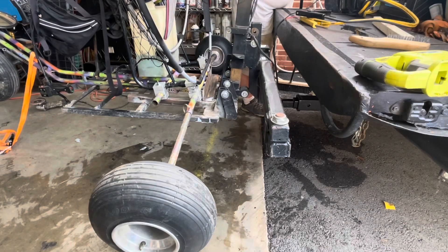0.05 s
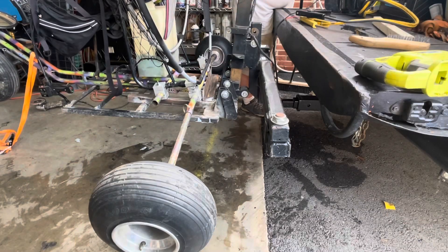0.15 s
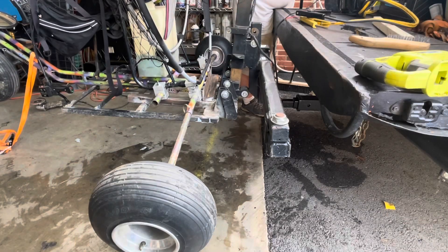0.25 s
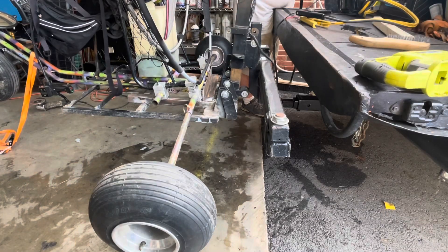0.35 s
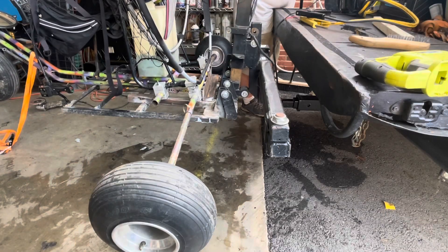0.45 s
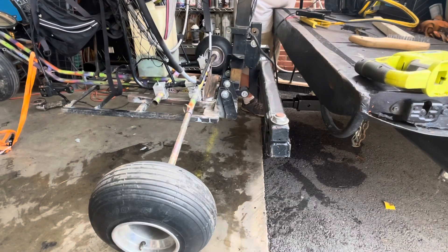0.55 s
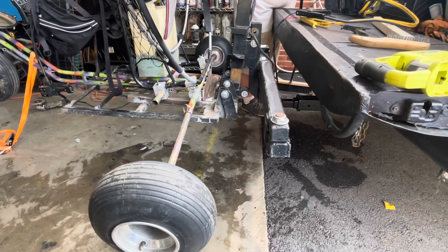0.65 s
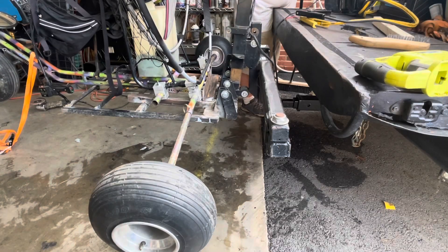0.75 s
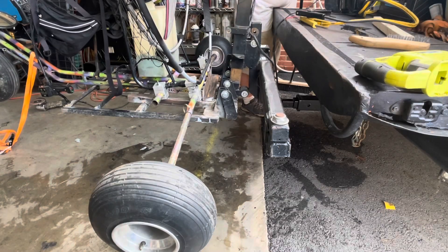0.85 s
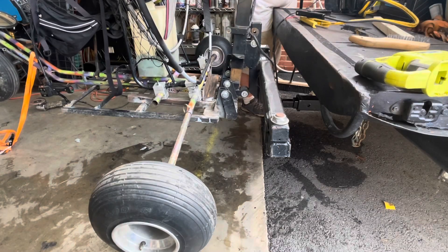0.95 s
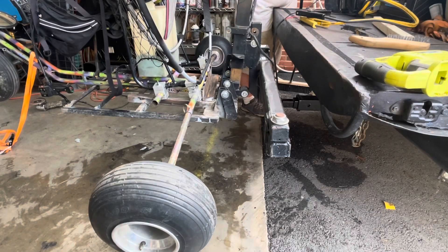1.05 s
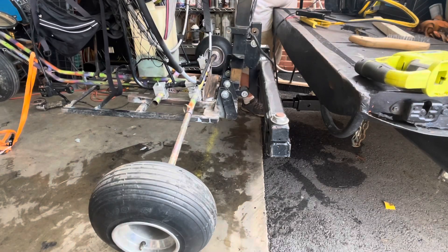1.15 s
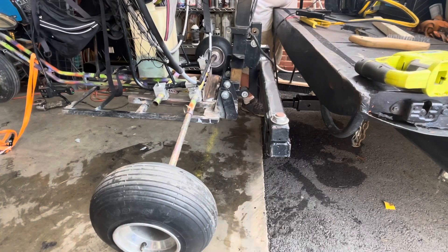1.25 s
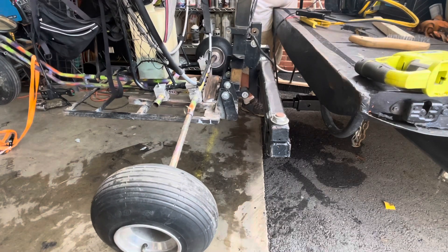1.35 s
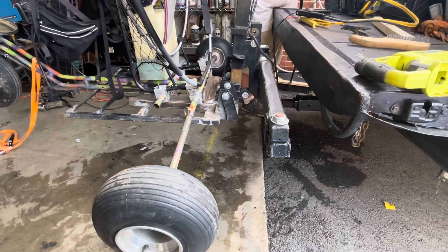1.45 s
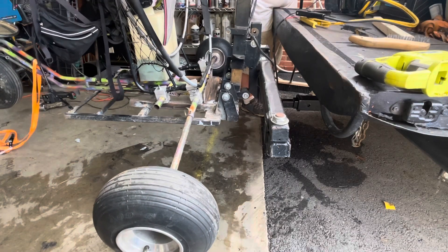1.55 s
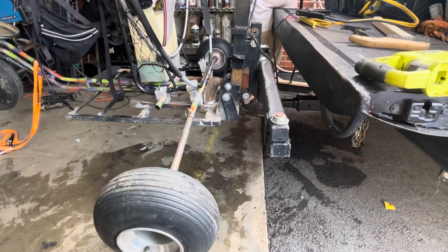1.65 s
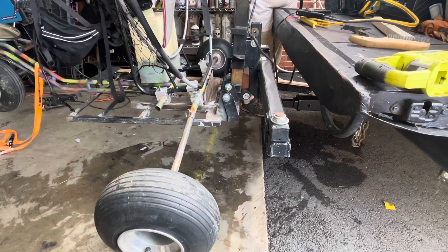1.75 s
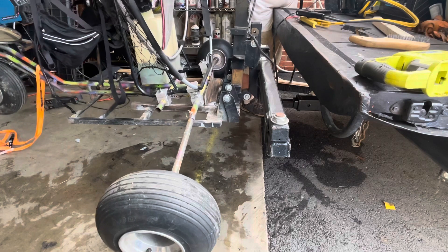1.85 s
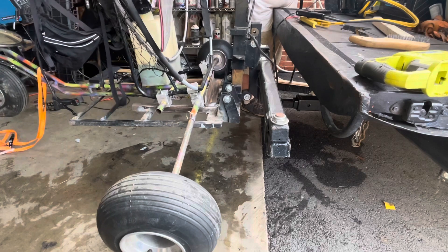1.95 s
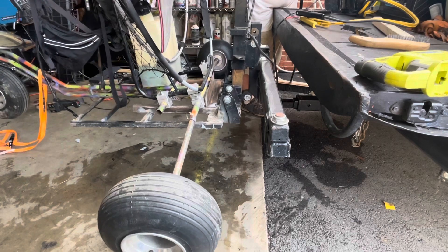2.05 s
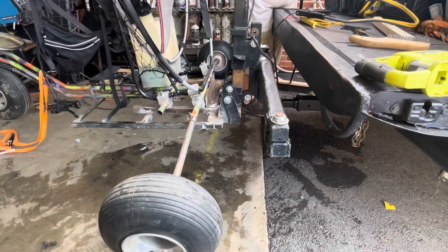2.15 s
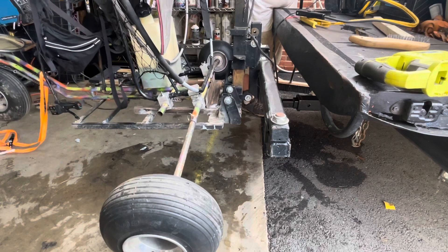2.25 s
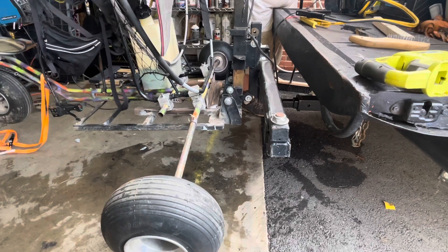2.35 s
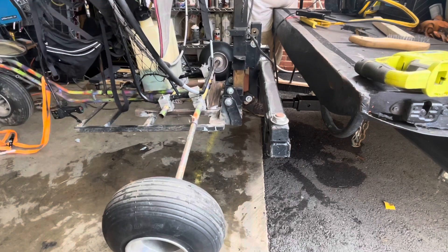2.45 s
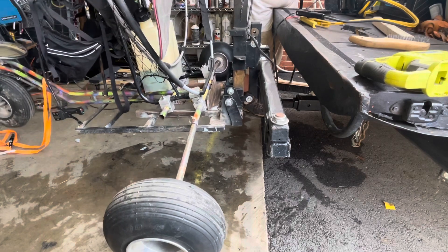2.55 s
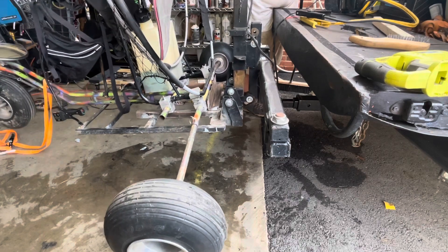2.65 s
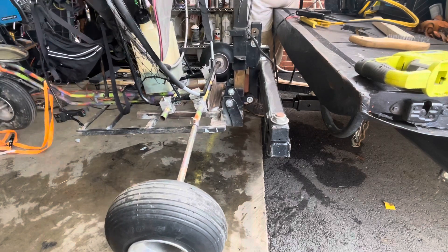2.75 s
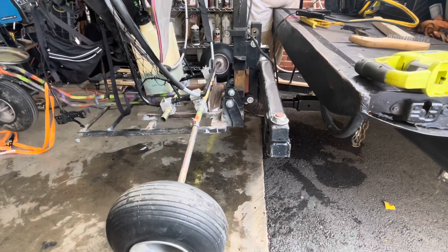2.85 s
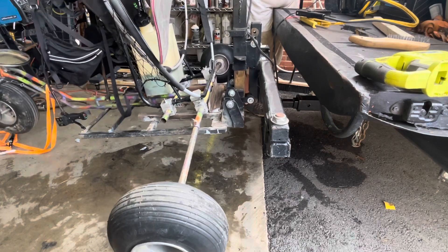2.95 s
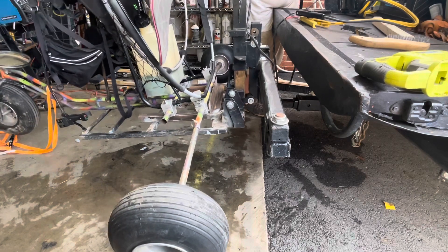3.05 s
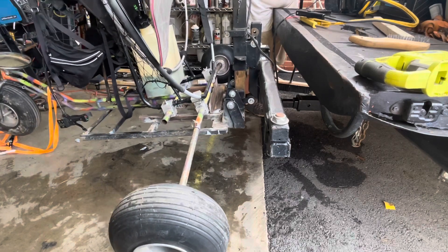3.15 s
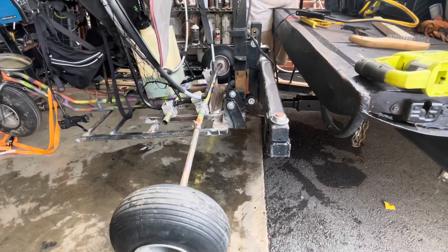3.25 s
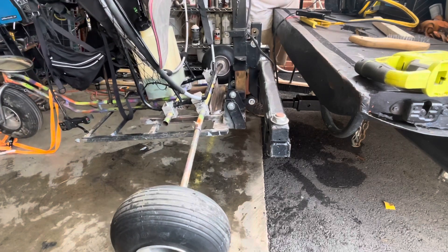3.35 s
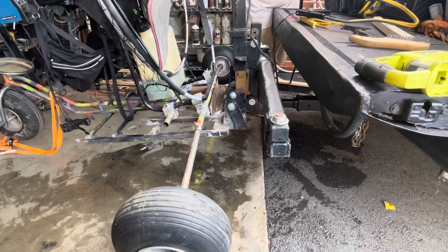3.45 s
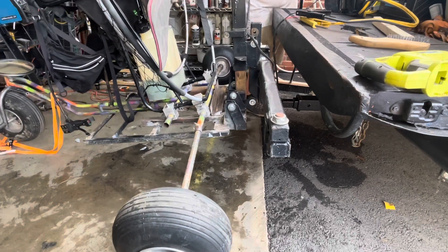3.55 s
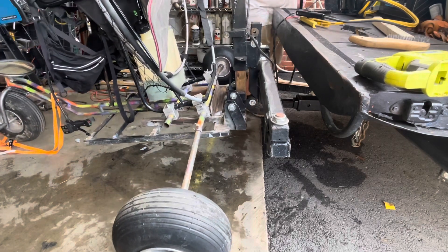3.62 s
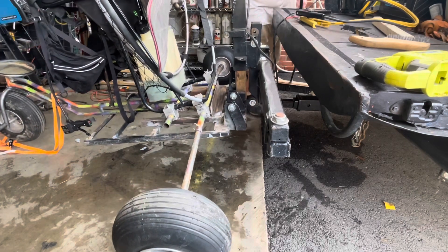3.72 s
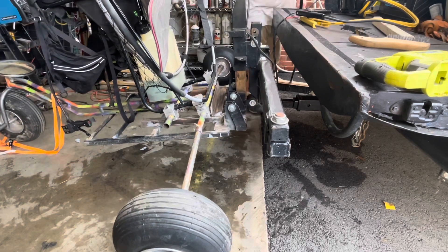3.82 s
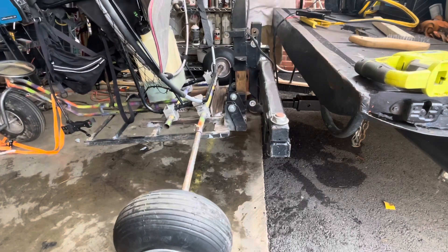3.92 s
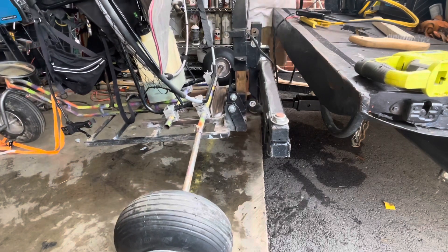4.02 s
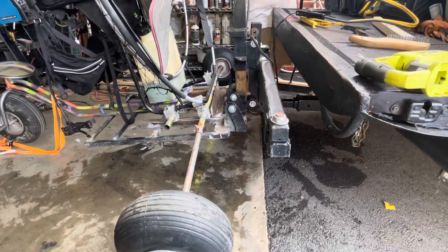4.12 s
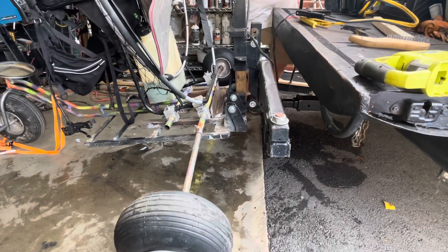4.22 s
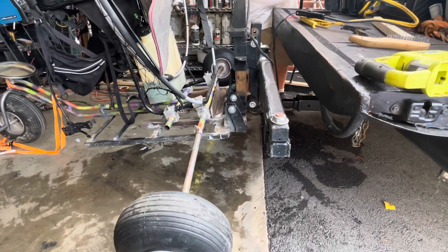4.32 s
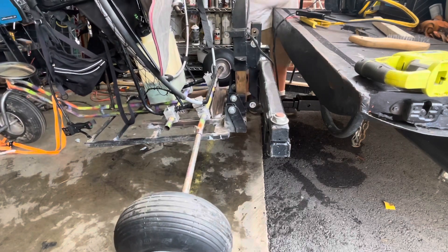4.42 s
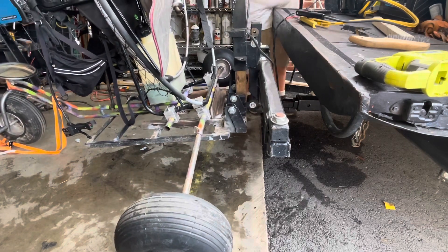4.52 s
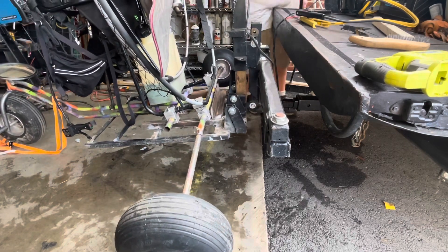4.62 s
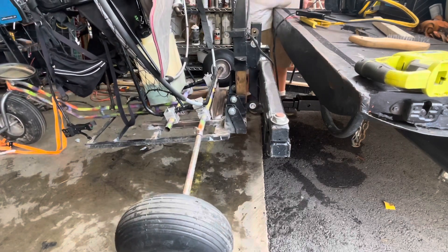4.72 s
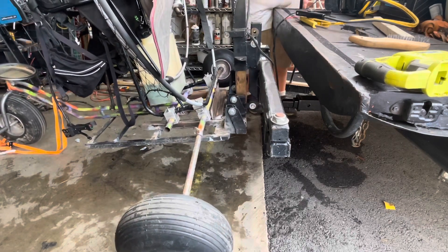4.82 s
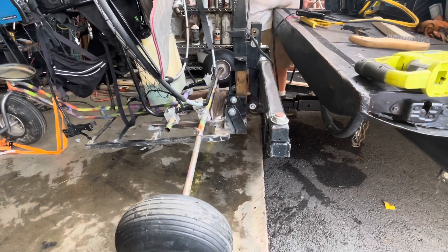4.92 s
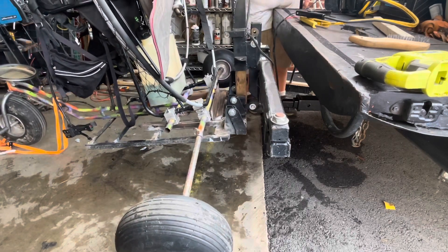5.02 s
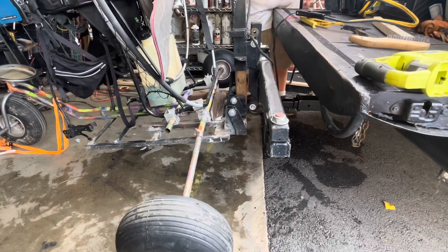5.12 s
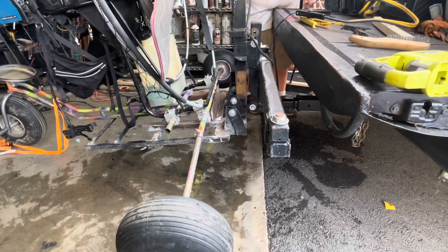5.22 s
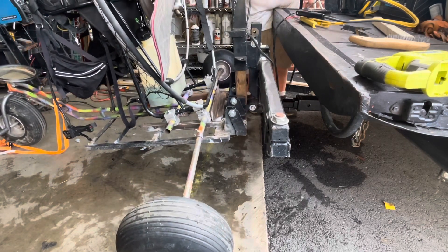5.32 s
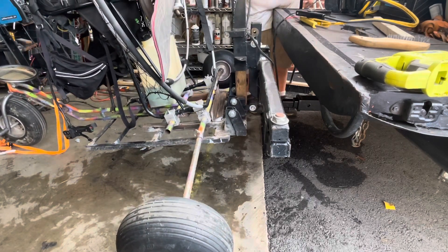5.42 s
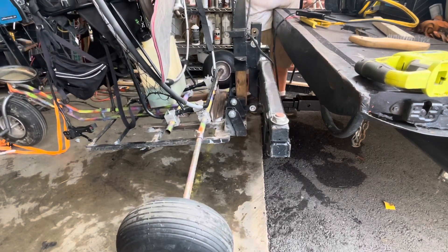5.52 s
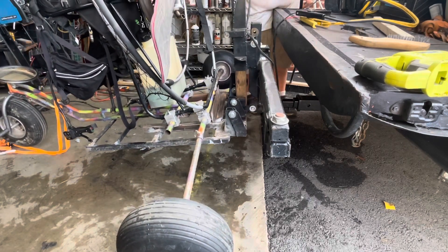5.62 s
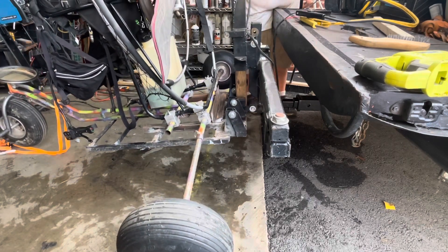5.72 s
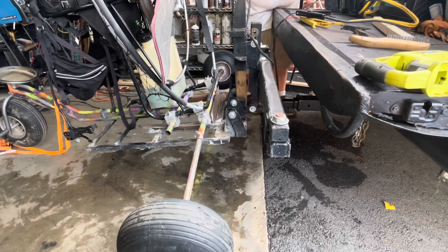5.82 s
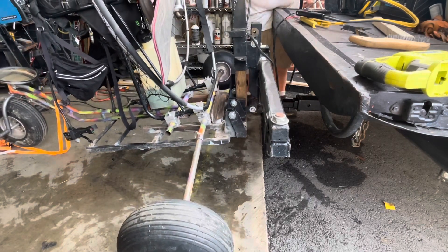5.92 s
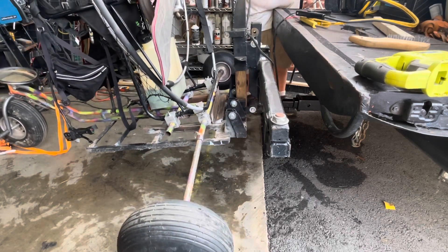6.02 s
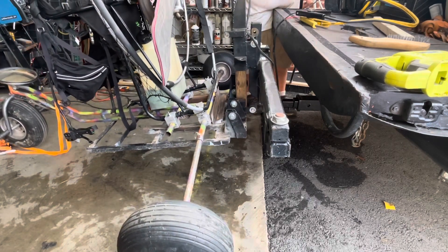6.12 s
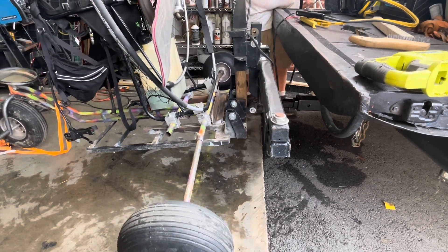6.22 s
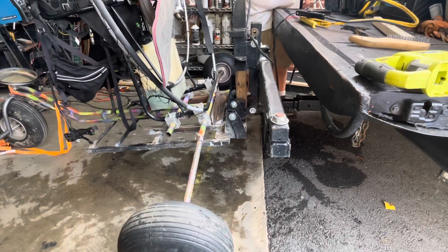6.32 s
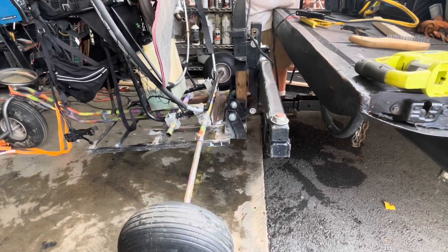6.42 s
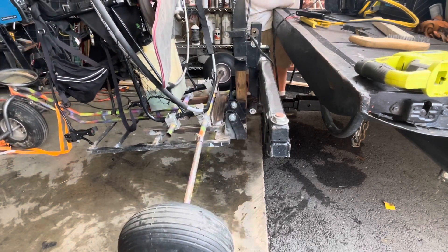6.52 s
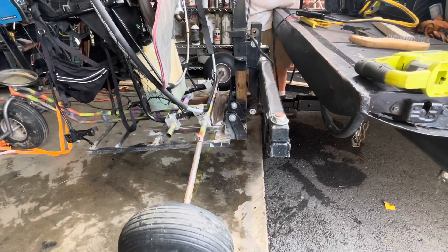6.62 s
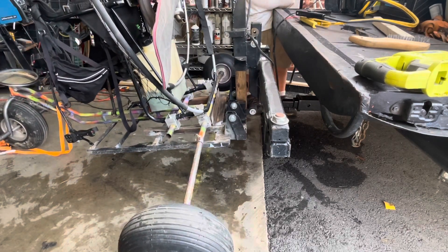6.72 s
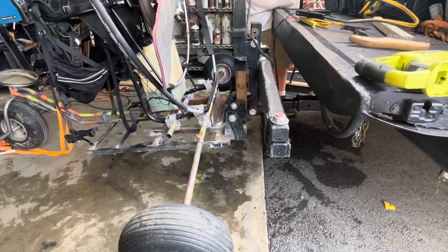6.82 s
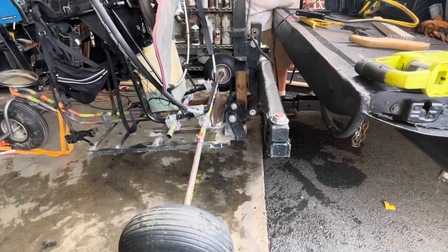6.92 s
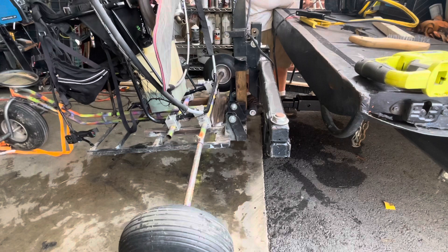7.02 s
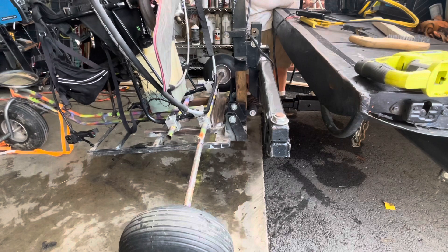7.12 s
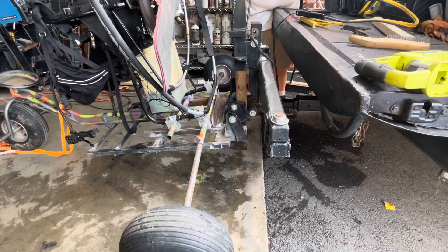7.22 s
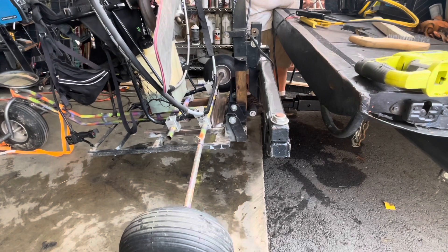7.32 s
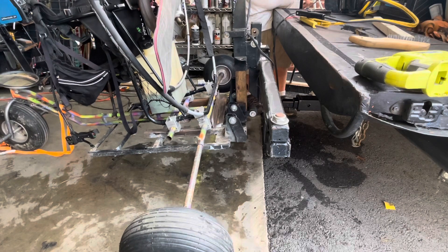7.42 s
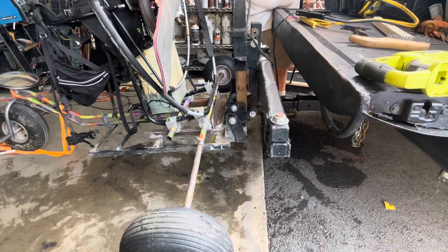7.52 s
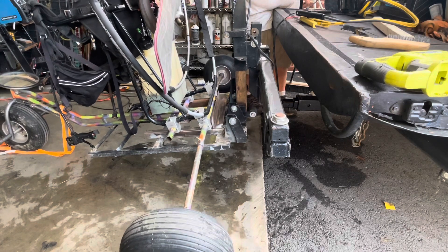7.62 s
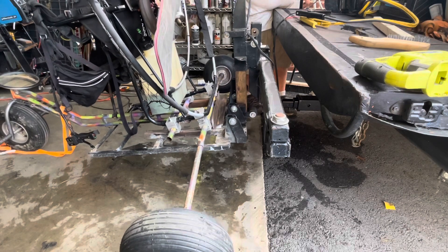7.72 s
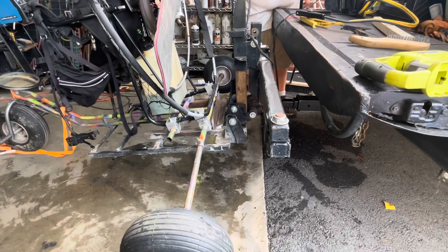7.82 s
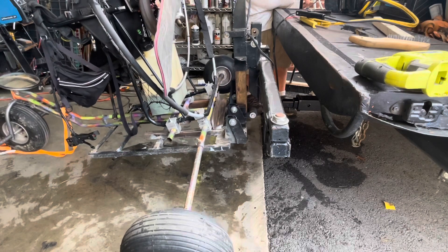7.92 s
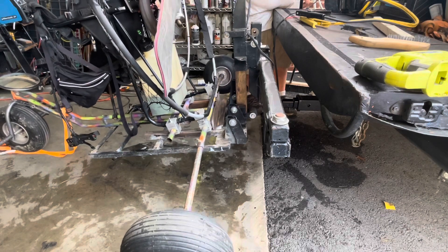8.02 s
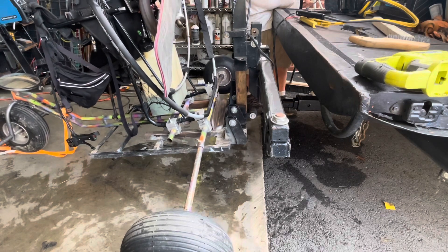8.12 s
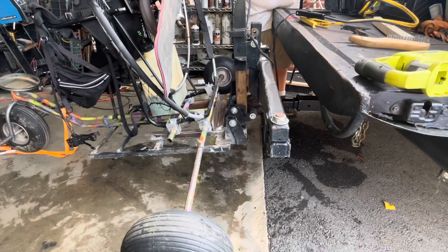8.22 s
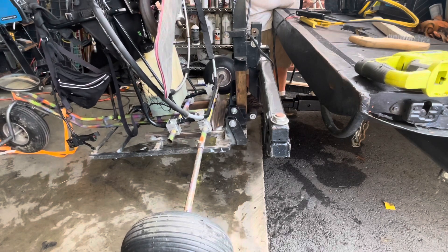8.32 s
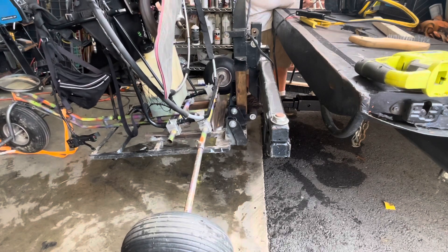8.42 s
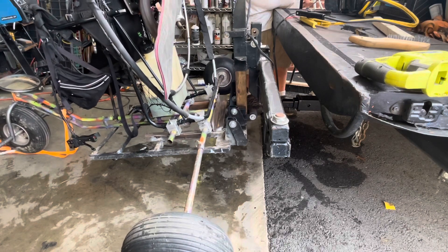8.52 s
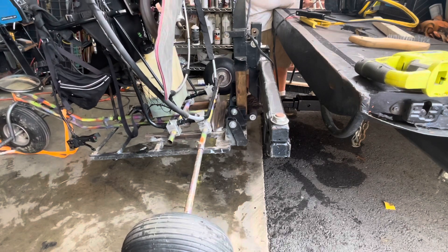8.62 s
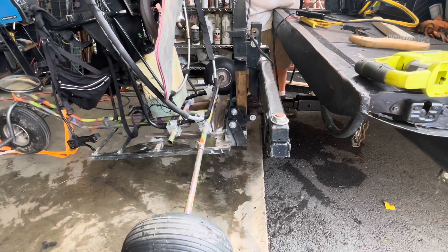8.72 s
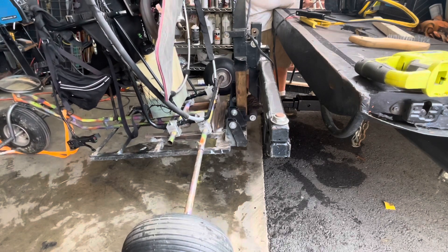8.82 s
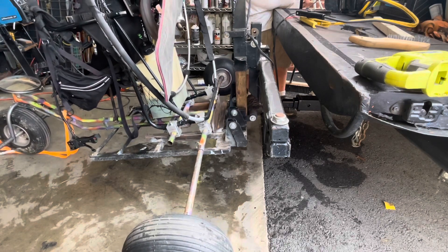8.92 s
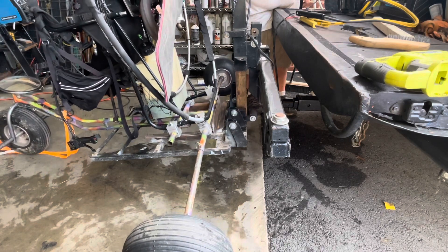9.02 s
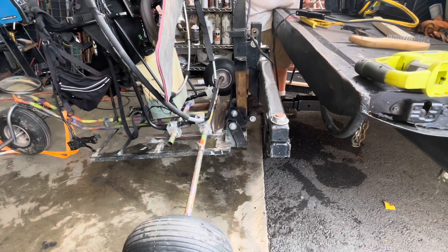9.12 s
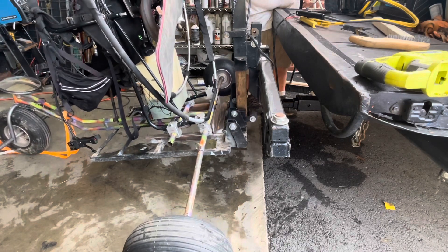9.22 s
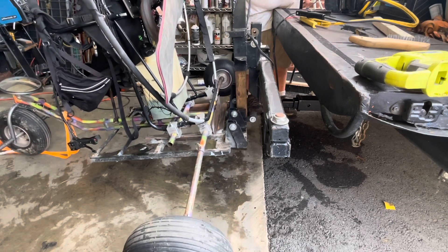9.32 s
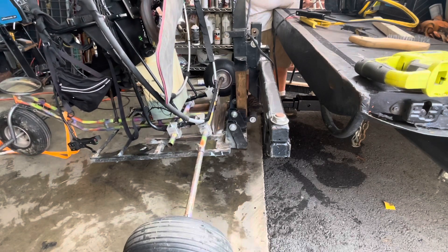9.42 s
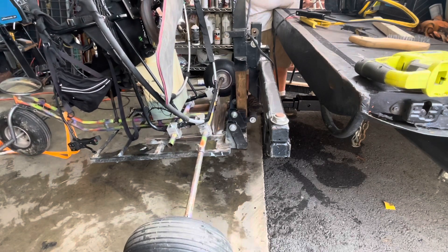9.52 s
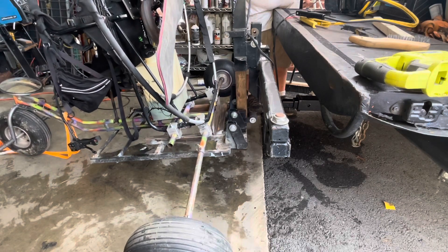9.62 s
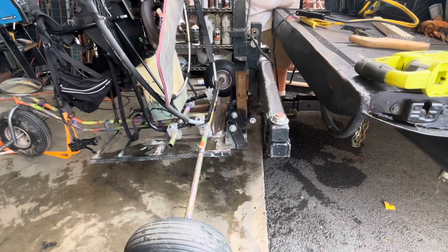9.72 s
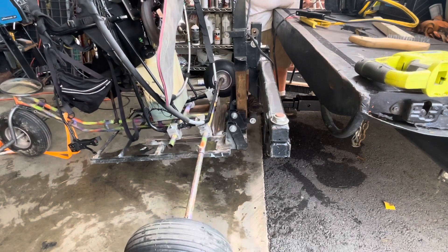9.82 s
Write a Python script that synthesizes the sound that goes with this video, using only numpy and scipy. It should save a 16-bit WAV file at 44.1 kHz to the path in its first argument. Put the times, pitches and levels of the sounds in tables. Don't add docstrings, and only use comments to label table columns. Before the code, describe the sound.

A garage opens onto low street rumble, faint mains-like hums and a thin high insect tone. From 0 to 0.8 seconds something rustles softly, strongest near 0.3, and a small switch clicks with a tiny bounce at 0.17. At 1.09 a relay clacks in several rapid metallic knocks, with a late one at 1.14. The lift motor spins up within about a tenth of a second, sweeping through ringing frame resonances while gears clatter. It then whines steadily around 1.1 and 2.3 kilohertz, throbbing three or four times per second, over gear rattle and bright brush hiss. Between 3.55 and 3.9 the frame scrapes grittily and jerks; the whine's colour shifts slightly. Pitch creeps up very gently. From 7 seconds a far vehicle drones low, swelling around 8.4 and 9. The motor is still running at the end, near 9.8. Close stereo microphone, short room reverberation.

```python
import sys
import numpy as np
from scipy import signal
from scipy.fft import rfft, irfft
from scipy.io import wavfile
from scipy.ndimage import uniform_filter1d

SR = 44100
rng = np.random.default_rng(int(sys.argv[2]) if len(sys.argv) > 2 else 0)


def ratio(d):
    e = np.asarray(d, float) / 20
    return 10 ** e


def wav_record(signal):
    frames = np.transpose(np.atleast_2d(signal))
    bounded = np.clip(frames, -1, 1)
    quanta = np.round(bounded * 32767).astype(np.int16)
    wavfile.write(sys.argv[1], SR, quanta)


N = 434826
T = np.arange(N) / SR
START_S = 1.091


def evened(x):
    return x / np.sqrt(np.mean(x ** 2) + 1e-20)


def read(points, hz):
    f, value = np.transpose(points)
    return np.interp(np.log(hz + 1), np.log(f + 1), value)


def curves(rows):
    s, *columns = np.transpose(rows)
    return [np.interp(T, s, c) for c in columns]


def slow(per_s, channels):
    knots = np.arange(0, T[-1] + 1, .25 / per_s)
    rows = uniform_filter1d(rng.standard_normal((channels, len(knots))), size=4)
    return evened(np.array([np.interp(T, knots, row) for row in rows]))


def padded(x, first=0):
    return np.pad(x, ((0, 0), (first, N - first - x.shape[1])))


def resonate(x, hz, width):
    turn = np.exp(2j * np.pi * np.cumsum(hz * np.ones(N)) / SR)
    r = np.exp(-np.pi * width / SR)
    return 2 * (turn * signal.lfilter([1 - r], [1, -r], x / turn)).real


def garage(x, t60=.35, wet_db=-3):
    t = np.arange(SR // 2) / SR
    tail = rng.standard_normal((2, len(t))) * ratio(-60 * t / t60) * (t > .004)
    tail = ratio(wet_db) * tail / np.linalg.norm(tail[0])
    tail[:, 0] = 1
    return signal.fftconvolve(x[None], tail, axes=1)[:, :len(x)] / np.linalg.norm(tail[0])


# frequency in Hz, left lead in rad.
PORT_LEAD = [(0, 0), (170, -.7), (600, 2.7), (1000, 1.3), (1700, .5), (2500, 1.2), (3200, 3), (5700, 3.5),
             (7000, 6.1), (7600, 5.7), (9200, 9.2), (10000, 8.6), (10900, 8.9), (12700, 6.28),
             (22050, 6.28)]
# frequency in Hz, left over right in dB.
PORT_DB = [(60, -4.5), (110, -6.5), (200, -7.5), (380, -6.0), (700, 0.0), (1290, 0.0), (2380, -2.5),
           (4400, 2.5), (8120, -0.5), (15000, 0.5)]
# frequency in Hz, likeness from 0 to 1.
PORT_SAME = [(50, .97), (150, .9), (350, .65), (800, .7), (1500, .7), (3000, .7), (4500, .45), (7000, .7),
             (8500, .5), (9800, .9), (11300, .65), (12700, .97)]


def ports(x, colour_db, patchy_db=0.):
    hz, _, z = signal.stft(x, SR, nperseg=1024, noverlap=640)
    turn, patches = rng.random((z.shape[1], 513, 2)).T
    patches = evened(uniform_filter1d(uniform_filter1d(patches - .5, 8, 0), 16, 1))
    same = np.clip(read(PORT_SAME, hz), 0, 1)[:, None]
    other = 1.5 * np.roll(z, 7, 0) * np.exp(2j * np.pi * uniform_filter1d(9 * turn, 3, 1))
    lag = np.exp(-1j * np.interp(hz, *np.transpose(PORT_LEAD)))[:, None]
    right = (same * z + np.sqrt(1 - same ** 2) * other) * lag
    half_db = read(PORT_DB, hz)[:, None] / 2
    colour = ratio(colour_db(hz)[:, None] + patchy_db * patches)
    pair = np.array([z * ratio(half_db), right * ratio(-half_db)]) * colour
    out = signal.istft(pair, SR, nperseg=1024, noverlap=640)[1][:, :len(x)]
    return out / np.sqrt(np.mean(out.mean(0) ** 2))


# frequency in Hz, density in dB per Hz.
STREET = [(20, -48), (38, -12.5), (55, 0), (80, -9.5), (115, -4.5), (170, -6.5), (340, -13), (450, -15),
          (900, -14.5), (1500, -39), (3000, -44), (5600, -42), (6900, -34), (9000, -49), (15000, -52)]
# frequency in Hz, width in Hz, level in dB.
HUMS = [(56, 15, -56), (119, 10, -61), (192, 7, -66), (239, 6, -67), (345, 12, -68), (6870, 110, -74)]
# time in seconds, frequency in Hz, level in dB.
FAR = [
    (6.3, 90, -80),
    (7.1, 96, -63),
    (7.9, 103, -62),
    (8.44, 106, -57),
    (8.7, 105, -60),
    (8.95, 112, -58),
    (9.3, 114, -64),
    (9.8, 122, -61),
]


def outdoors():
    rumble = ratio(-58) * ports(rng.standard_normal(N), lambda hz: read(STREET, hz), patchy_db=2.0)
    bins = np.fft.rfftfreq(N, 1 / SR)
    shape = sum(ratio(db) / np.sqrt(width) / (1 + (2 * (bins - hz) / width) ** 2) for hz, width, db in HUMS)
    hums = irfft(rfft(rng.standard_normal(N)) * shape * np.sqrt(SR / np.pi * 2), N)
    far_hz, far_db = curves(FAR)
    far = resonate(resonate(rng.standard_normal(N), far_hz, 9.4), far_hz, 30.0)
    return rumble + (hums + ratio(far_db) * evened(far)) * ratio([[-3.8], [2.6]])


def friction(rows, colour, per_s, uneven_db):
    first, last = round(rows[0][0] * SR), round(rows[-1][0] * SR)
    count = last - first
    size = ratio(uneven_db * rng.exponential(1, count)) * (rng.random(count) < per_s / SR)
    slips = ports(size * rng.standard_normal(count), lambda hz: read(colour, hz))
    return ratio(curves(rows)[0]) * padded(slips, first)


# time in seconds, level in dB.
RUSTLE = [
    (0, -83),
    (.08, -79),
    (.19, -80),
    (.3, -67),
    (.37, -77),
    (.52, -76),
    (.65, -75.5),
    (.75, -83),
    (.85, -99),
]
# frequency in Hz, density in dB.
RUSTLE_COLOUR = [(500, -12), (1500, 2.5), (3000, -2), (5000, -4), (8000, -22), (10000, -16), (13000, -13),
                 (15500, -24)]


def rustle():
    return friction(RUSTLE, RUSTLE_COLOUR, per_s=17000, uneven_db=2.5)


def knock(modes, blows, crack_db):
    t, train = np.arange(12000) / SR, np.zeros(2 * SR)
    for s, db in blows:
        train[round(s * SR)] = ratio(db)
    ring = sum(ratio(db - 60 * t / t60) * np.sin(2 * np.pi * hz * t) for hz, db, t60 in modes)
    noise = signal.lfilter([1, -1], [1, -.8], rng.standard_normal(len(t)))
    ring = ring + ratio(crack_db - 60 * t / .025) * noise
    return signal.oaconvolve(train, ring * np.clip(t / 0.00078, 0, 1))[:2 * SR]


# frequency in Hz, level in dB, t60 in seconds.
SWITCH = [(1800, -3, .035), (1812, -19, .2), (3750, -20, .015), (4440, -19, .02), (5050, -21, .012)]


def switch_click():
    return knock(SWITCH, [(.1715, -32.5), (.1782, -40)], -22)


# frequency in Hz, level in dB, t60 in seconds.
FRAME = [(573, -10, 0.14), (860, -4, 0.29), (1120, 6.5, 0.065), (1420, 0, 0.085), (1890, -4, 0.04),
         (4000, 5, 0.0082), (4500, -9, 0.044), (7600, -5, 0.033), (8550, -17, .04), (10900, -14, .03)]
# time in seconds, level in dB.
BLOWS = [
    (1.0915, -43),
    (1.094, -37),
    (1.1025, -34),
    (1.1075, -40),
    (1.138, -39),
]


def relay_clack():
    return knock(FRAME, BLOWS, 0.5)


# peak time in seconds, frequency in Hz, level in dB, t60 in seconds.
SHAKES = [
    (1.095, 1930, -28, .05),
    (1.104, 1700, -34, .06),
    (1.11, 1480, -33, .1),
    (1.108, 1170, -35, .08),
    (1.105, 830, -40, .1),
    (1.138, 1740, -31, .05),
    (1.146, 900, -31, .07),
    (1.16, 1420, -36, .1),
    (1.19, 1080, -40, .12),
]


def shakes():
    t = T[:2 * SR]
    out = np.zeros(2 * SR)
    for s, hz, db, t60 in SHAKES:
        envelope_db = np.where(t < s, (t - s) / 0.017 * 20, -60 * (t - s) / t60)
        out += ratio(db + envelope_db) * (t > START_S) * np.sin(2 * np.pi * (hz * t + rng.random()))
    return out


# time in seconds, level in dB.
SCRAPE = [
    (3.55, -63),
    (3.582, -72),
    (3.6, -52),
    (3.678, -48),
    (3.784, -50.5),
    (3.81, -43.5),
    (3.89, -117),
    (3.9, -78),
]
# frequency in Hz, density in dB.
SCRAPE_COLOUR = [(100, -1), (300, -7.5), (600, -1.5), (900, 1), (1600, -6.5), (3000, -4), (6000, -15),
                 (12000, -60)]


def scrape():
    return ratio(4.0) * friction(SCRAPE, SCRAPE_COLOUR, per_s=1700, uneven_db=1.5)


def beat(parts, wheel):
    pairs = zip(parts[::2], parts[1::2])
    return sum(c * np.cos(k * wheel) + s * np.sin(k * wheel) for k, (c, s) in enumerate(pairs, 1))


# time in seconds, shaft speed in turns per s.
SPEED = [(1.31, 70.9), (1.5, 70.68), (1.7, 70.35), (2.0, 70.26), (2.3, 70.68), (3.0, 70.78), (3.5, 70.96),
         (3.62, 70.51), (3.75, 71.03), (4.3, 70.87), (5.0, 70.94), (5.7, 71.07), (6.4, 71.3), (7.1, 71.24),
         (7.8, 71.5), (8.5, 71.67), (9.2, 71.78), (9.86, 71.84)]
# cos and sin parts once, twice, thrice a wheel turn, in turns per s.
WOBBLE = [-.11, .09, -.08, -.08, .03, .04]


def shaft():
    gear, spin_gap, spin_s, spin_shape = 20, 26, .068, 1.6
    on = T > START_S
    shortfall = spin_gap * np.exp(-(np.maximum(T - START_S, 0) / spin_s) ** spin_shape)
    speed = (curves(SPEED)[0] - shortfall) * on
    wheel = 2 * np.pi * np.cumsum(speed) / SR / gear
    angle = 2 * np.pi * np.cumsum(speed + beat(WOBBLE, wheel) * on) / SR
    return angle, wheel, speed


def per_turn(angle, heights, loose):
    tables = irfft(heights * np.exp(2j * np.pi * rng.random((3, len(heights)))), 16384) * 8192
    at = (angle / (2 * np.pi) % 1 * 16384).astype(int)
    a, b = slow(11, channels=2)
    return (tables[0, at] + loose * (a * tables[1, at] + b * tables[2, at])) / np.sqrt(1 + 2 * loose ** 2)


# frequency in Hz, density in dB per Hz.
HISS = [(2300, -25), (2800, -13), (3150, -19.5), (3600, -14), (4900, -17.5), (5500, -12.5), (6700, -11.5),
        (7300, -16.5), (8600, -9.5), (9400, -5.5), (10300, -5.5), (11200, -7), (13000, -16), (13700, -22.5),
        (14000, -27), (15200, -19), (15600, -48)]
# frequency in Hz, width in Hz, level in dB over the hiss.
HOUSING = [(3450, 200, 5), (4540, 150, 5), (5680, 120, 5), (6100, 200, 5), (6850, 200, 7), (7970, 200, 5),
           (7350, 200, -4), (8480, 350, -5), (8950, 500, 9), (9550, 250, -6), (10000, 600, 9),
           (10650, 400, -7), (11350, 400, 4), (12500, 200, 3)]


def brush_hiss(once_a_turn, every_order):
    since = np.maximum(T - START_S, 0)
    build = ratio(-42.5 - 17 * np.maximum(1 - since / 0.078, 0))
    spit = ratio(np.maximum(-37.5 - 1100 * since, -120))
    flicker = ratio(0.15 * evened(uniform_filter1d(rng.standard_normal(N), 2500)))
    hiss = flicker * (once_a_turn * rng.standard_normal(N) + 0.51 * every_order)
    rings = lambda hz: sum(db / (1 + (2 * (hz - f) / width) ** 2) for f, width, db in HOUSING)
    return (build + spit) * ratio(-0.33) * ports(hiss, lambda hz: read(HISS, hz) + rings(hz))


# frequency in Hz, density in dB per Hz.
RATTLE = [(150, -53), (250, -16.5), (639, -12), (959, -10), (1120, -19), (1190, -20), (1230, -12.5),
          (1670, -2), (2020, -4.5), (2320, -2), (2420, -10.5), (3100, -19.5), (3200, -63), (4160, -88),
          (7040, -120)]


def gear_rattle(speed, once_a_turn, every_order):
    since = np.maximum(T - START_S, 0)
    clatter_db = 16.5 * np.minimum(since / 0.016, 1) * np.exp(-since / 0.082)
    level_db = -53.5 + 1.9 * (np.maximum(speed, 70.35) - 71) + clatter_db
    rattle = once_a_turn * rng.standard_normal(N) + 0.5 * every_order
    return ratio(level_db) * ratio(6.0) * ports(rattle, lambda hz: read(RATTLE, hz), patchy_db=1.5)


# multiple of the shaft speed, level in dB.
ORDERS_DB = [(4, -62), (8, -68), (12, -62), (14, -65), (15, -66), (18, -66), (19, -64), (21, -63),
             (22, -63), (24, -58), (28, -56), (31, -56), (33, -61), (34, -59), (36, -61), (48, -61),
             (50, -66), (64, -61), (66, -68), (79, -65), (80, -55), (82, -64), (96, -59), (97, -63),
             (98, -66), (112, -58), (124, -60), (128, -57), (140, -62), (160, -62)]


def weak_orders(angle):
    heights = np.zeros(200)
    for multiple, db in ORDERS_DB:
        heights[round(multiple)] = np.sqrt(2) * ratio(db)
    on = np.clip((T - START_S) / 0.0016, 0, 1)
    return ratio(-.3) * garage(on * per_turn(angle, heights, loose=.42), t60=.28, wet_db=0.)


PATTERN_SPEEDS = [70.35, 70.8, 71.1, 71.35, 71.67, 72.0, 72.37, 72.85]


def whine(rows, leads, angle, wheel, place, flutter_db):
    left_db, right_db, *throb = [np.interp(place, PATTERN_SPEEDS, db) for db in np.transpose(rows)]
    lead = np.interp(place, np.linspace(PATTERN_SPEEDS[0], PATTERN_SPEEDS[-1], len(leads)), leads)
    level_db = [left_db, right_db] + beat(throb, wheel) + flutter_db * slow(30, channels=2)
    return np.sqrt(2) * ratio(level_db) * np.sin([angle + lead / 2, angle - lead / 2])


# left dB, right dB, throb in dB as cos and sin
SLOT = [(-39.5, -45, -4, .6, 1.8, -5.5), (-38.5, -47.5, -0.5, 0, -1.1, -0.5), (-50, -41, 3, -.3, -0.89, 0),
        (-39.5, -39, 1.2, -2, -.2, -0.8), (-41.5, -41.5, 3, -1.5, -.3, 0.3),
        (-42, -43.5, -1, -1.4, 2., -0.5), (-43, -37, -0.5, -2.5, 0.68, -1.1),
        (-42, -39.7, 2.5, -1.3, -0.45, 1.7)]
# left dB, right dB, throb in dB as for the slot order.
SLOT_TWICE = [(-38, -39, 1, -.8, 1.2, 0.5), (-46, -42.5, 1.5, 0.23, 0, 3),
              (-41.5, -41.5, 1.5, -1.3, 3, 0.8), (-48.5, -42.5, -3.8, -0.63, -3.5, 3),
              (-39, -34, -0.1, .1, -2.5, 0.5), (-36.5, -33, 2, .4, 1.5, 1), (-41, -38, -1, .5, 1.6, -1.7),
              (-41, -39.5, 3.5, -.9, -0.7, -2)]
# left dB, right dB, throb in dB as cos and sin once a wheel turn.
SIDEBAND = [(-67, -70, -1, 6), (-66, -60, 3, 1), (-67, -62, -1, 3), (-73, -57, 8, -.3),
            (-65, -55.5, -2, 1.3), (-55, -47, -4.5, 7), (-42.5, -41.5, 1, 0), (-47.5, -51.5, 3, 3.5)]
SLOT_LEAD = (3, 1.52, 2, 1.2, 1.02, 1.4)
TWICE_LEAD = (0.76, 0.13, 0.76, 0.87, 1.04, 1.52)
SIDEBAND_LEAD = (.9, .9)


def slot_whine(angle, wheel, speed):
    place = speed + .15 * (T > 3.7) + .1 * (T - SPEED[0][0])
    out = whine(SLOT, SLOT_LEAD, 16 * angle, wheel, place, 1.2)
    out += whine(SLOT_TWICE, TWICE_LEAD, 32 * angle, wheel, place, 1.9)
    out += whine(SIDEBAND, SIDEBAND_LEAD, 30 * angle, wheel, place, 3.)
    return out * np.clip((T - START_S) / .11, 0, 1) ** 2


def motor():
    angle, wheel, speed = shaft()
    on = np.clip((T - START_S) / 0.0016, 0, 1)
    every_order = evened(per_turn(angle, np.arange(230) > 3, loose=0.47))
    once_a_turn = 1 + 0.13 * np.cos(angle) + 0.12 * np.cos(2 * angle)
    noise = brush_hiss(once_a_turn, every_order) + gear_rattle(speed, once_a_turn, every_order)
    return slot_whine(angle, wheel, speed) + weak_orders(angle) + on * noise


def scene():
    clicks = switch_click() + relay_clack() + shakes()
    clicks = padded(garage(clicks, t60=0.36, wet_db=-1.5))
    return outdoors() + rustle() + clicks + scrape() + motor()


def roll_off(x):
    return signal.sosfilt(signal.butter(12, 15650, fs=SR, output="sos"), x)


def record(dry):
    cut = signal.sosfilt(signal.butter(4, 47, "high", fs=SR, output="sos"), dry)
    return roll_off(cut)


dry = scene()
out = record(dry)
wav_record(out)
```